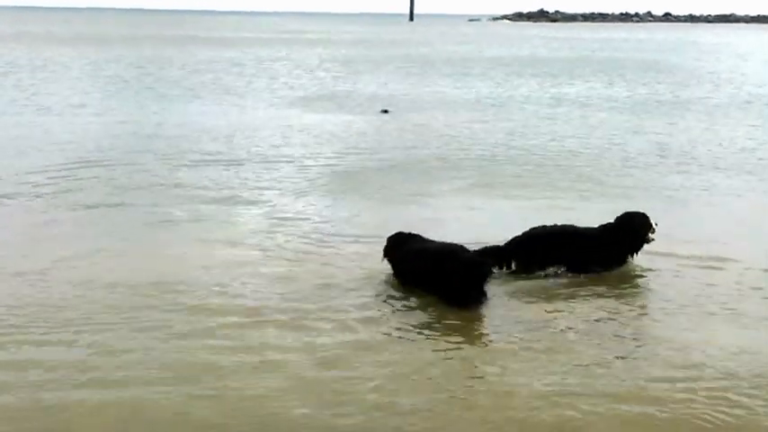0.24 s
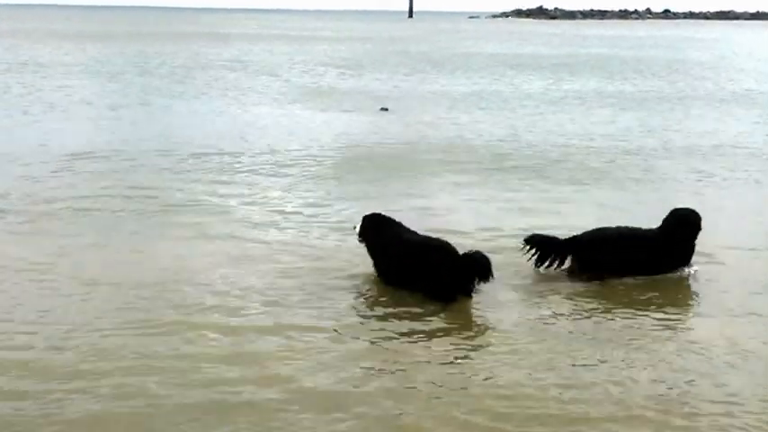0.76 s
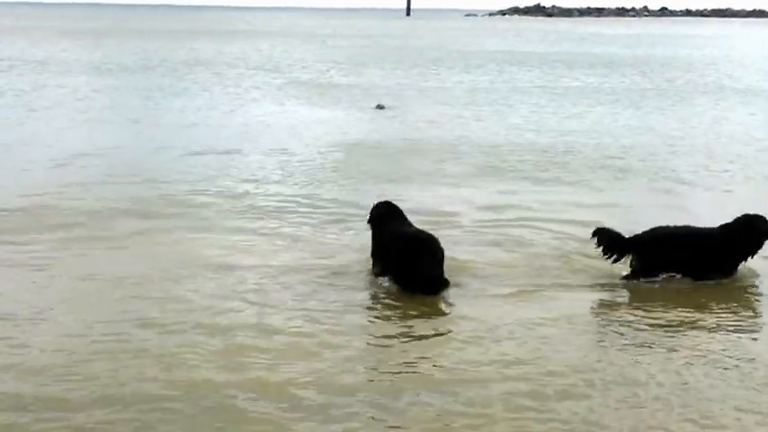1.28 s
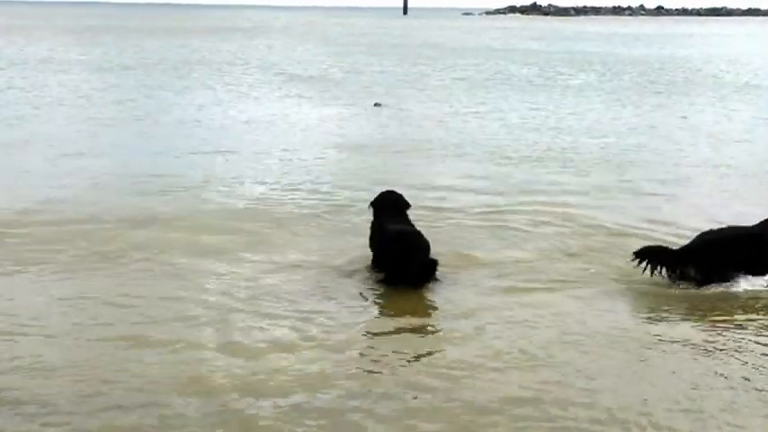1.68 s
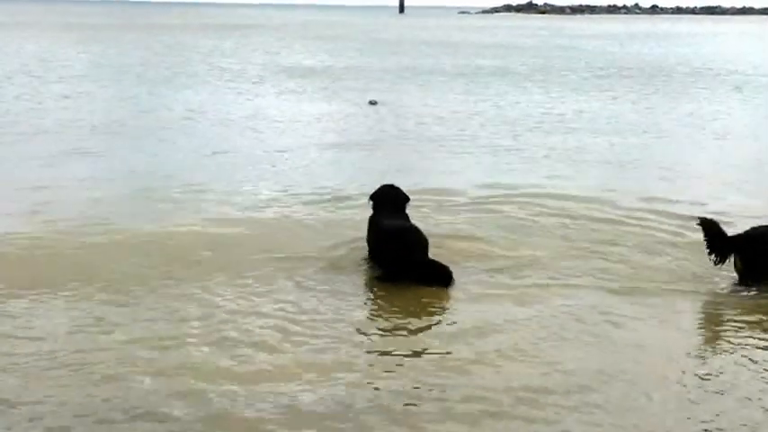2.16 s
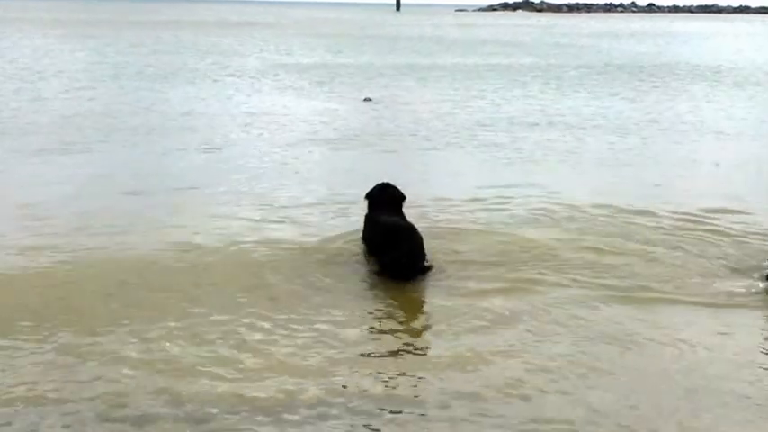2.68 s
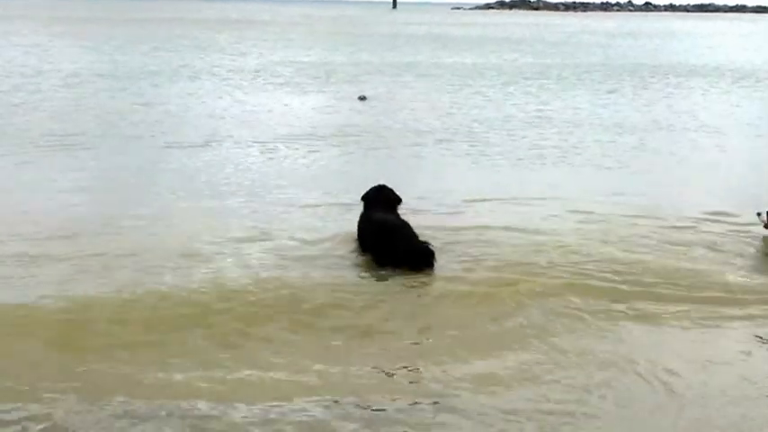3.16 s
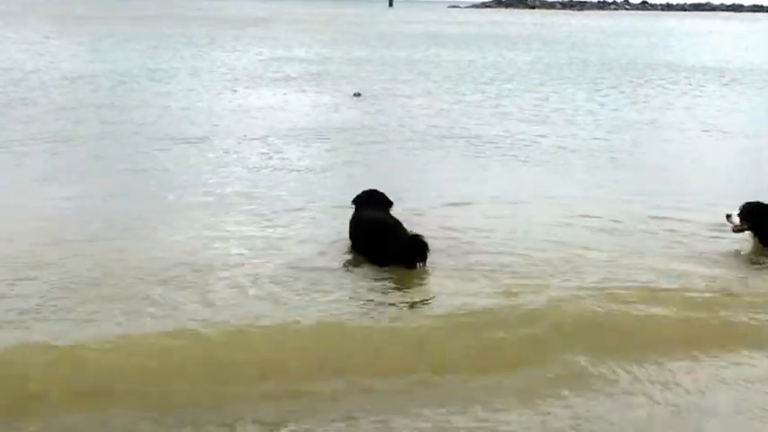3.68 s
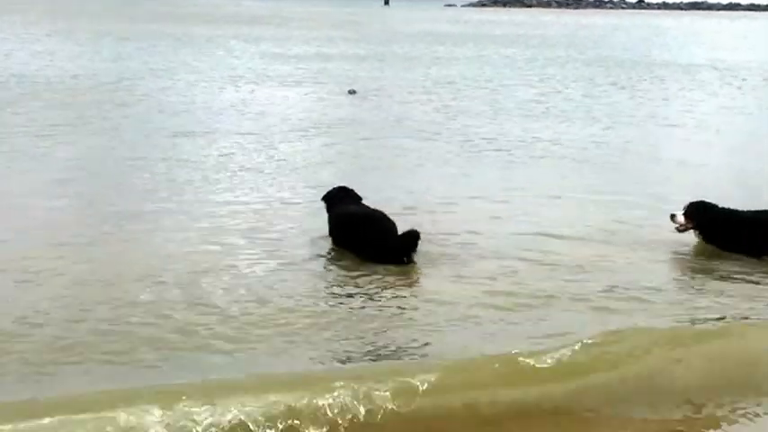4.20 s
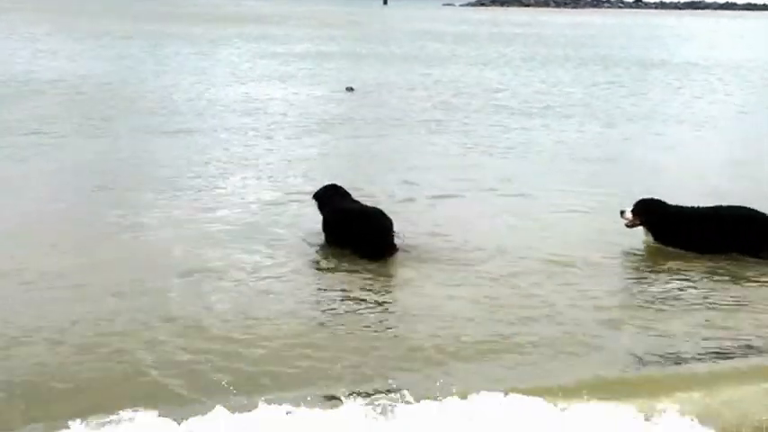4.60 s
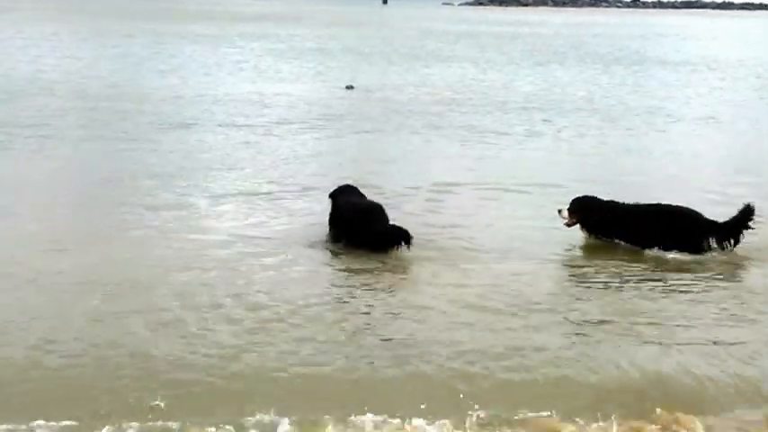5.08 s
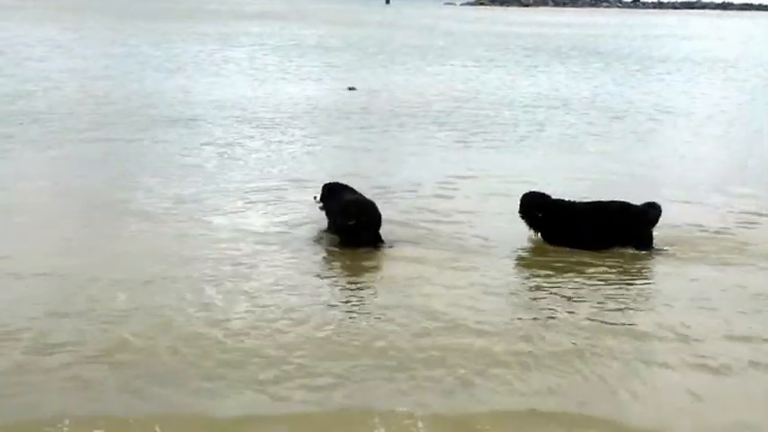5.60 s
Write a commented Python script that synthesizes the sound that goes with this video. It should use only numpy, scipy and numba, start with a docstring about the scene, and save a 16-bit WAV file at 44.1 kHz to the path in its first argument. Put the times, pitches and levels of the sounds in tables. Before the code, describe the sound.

At a sandy shore, a small wave spills with gurgling, slaps and fizzing spray while wind gusts thump the microphone. The water then calms to light drips over a faint murmur of surf further off. Finally a larger wave curls, slaps down and rushes up the sand in bright, bubbly hiss. One microphone stands a few steps away, outdoors, without echo.

```python
"""Small waves reach a sandy beach, heard from a few steps away at one microphone.
At first one spills over amid gusts of wind; then the water lies calm and drips.
Last, a larger wave curls, slaps down and runs up the sand.
Damped bubble rings, from big gurgling ones to fine fizz, make the wash, slaps, thumps of trapped air and drips.
Throughout, filtered noise makes the wind, and noise with foam bubbles makes the surf further along the shore."""
import sys
import numpy as np
from scipy import signal
from scipy.fft import rfft, irfft, next_fast_len
from scipy.io import wavfile
from scipy.ndimage import uniform_filter1d
from numba import njit

SR = 44100
rng = np.random.default_rng(int(sys.argv[2]) if len(sys.argv) > 2 else 0)


def inscribe(sig):
    """Save sig as 16-bit PCM at rate SR to the path in sys.argv[1].

    A 1-D sig is mono; a 2-D sig holds one channel per row.
    Samples are clipped to [-1, 1] before scaling.
    """
    pcm = np.round(np.clip(np.atleast_2d(sig).T, -1, 1) * 32767)
    wavfile.write(sys.argv[1], SR, pcm.astype(np.int16))


N = 257884
TIME = np.arange(N) / SR  # s
RISE = 0.2  # share by which a bubble's pitch climbs while it rings

# pushes of water up the sand or back: (start t/s, build-up t/s, hold t/s, fall/(dB/s),
# fizzing spray level/dB, churning water level/dB, big bubbles level/dB)
SURGES = [(-0.3, 0.28, .3, 22, -40, -40, -45), (0.194, 0.14, 0.97, 44, -36, -37.5, -41),
          (0.5, 0.17, 0.2, 42, -38, -38, -34), (0.81, 0.095, 0.29, 68, -27, -40, -44),
          (0.978, 0.038, 0.044, 70, -39, -27, -33), (1.105, 0.073, 0.044, 92, -24, -31, -33),
          (1.3, 0.059, 0.38, 23.5, -40.5, -39, -43), (1.95, 0.2, 0.17, 7, -50.5, -58, -43.5),
          (2.738, 0.11, 0.086, 42.5, -52, -45.5, -56), (4.124, 0.13, 0.47, 9.5, -19.5, -29, -37),
          (4.48, 0.25, 0.083, 21.5, -16, -20, -24.5), (5.055, 0.1, 0.1, 41, -24, -25.5, -28),
          (5.25, 0.058, 0.28, 26, -28, -55.5, -41), (5.616, 0.053, 0.034, 71, -40, -28, -31.5)]
# relative spectrum of the larger bubbles: (f/Hz, level per Hz/dB)
BUBBLE_SPECTRUM = [(60, -23), (110, -0.5), (220, -1), (330, 0), (420, -3.5), (610, 4.5), (790, 0.5),
                   (1020, 1.5), (1180, -2), (1400, -6), (2200, -10)]
# relative spectrum of spray close by: (f/Hz, level per Hz/dB)
NEAR_SPRAY_SPECTRUM = [(1000, 10), (1380, -2.5), (1650, -0.5), (2080, -9), (2780, 3), (3150, -1),
                       (4000, -2.5), (5100, 2.5), (6200, -1), (7250, 6), (8400, -5), (9350, -4.5),
                       (10400, -12), (11700, -8.5)]
# relative spectrum of fizz further out: (f/Hz, level per Hz/dB)
FAR_FIZZ_SPECTRUM = [(1000, -18), (1400, -1.5), (1900, -1), (2750, 4.5), (3300, 2.5), (4000, -4), (5550, 6),
                     (6350, 1.5), (7400, 8), (8300, -7.5), (9400, -4), (10700, -19)]
NEAR_DB, FAR_DB = -14, -35  # fizz level of a wave at the feet and of one further out
SPLASH_DB = -4.5  # splash against the mean of the spray and churn levels


def wash():
    """Bubble resonance: breaking water entrains air, and the smaller the bubble the higher its pitch."""
    *_, sprayed_db, churned_db, trapped_db = np.transpose(SURGES)
    # heavier water takes longer to build up than the fizz, and dies away at its own pace
    fizz_db = surging(sprayed_db)
    thrown_db = (sprayed_db + churned_db) / 2 + SPLASH_DB
    splash_db = surging(thrown_db, build=1.67, fall=1.58)
    churn_db = surging(churned_db, build=1.38, fall=0.87)
    gurgle_db = surging(trapped_db, build=1.29, fall=0.74)

    gurgle = swarm(156.6, 414, rate=430, cycles=7.6, spread_db=0.7, clump_db=0.0)
    gurgle = unit(colour(gurgle, BUBBLE_SPECTRUM)) * undb(gurgle_db)
    churn = swarm(423, 1252, rate=1700, cycles=18.6, spread_db=1.5, clump_db=1.0)
    churn = unit(colour(churn, BUBBLE_SPECTRUM)) * undb(churn_db)
    splash = swarm(1239, 2280, rate=900, cycles=30.0, spread_db=-2.5, clump_db=-1.3)

    # the countless faintest bubbles merge into a hiss under those heard singly
    hiss = colour(rng.standard_normal(N), [(1800, -21), (2350, -0.5), (11800, -1), (14000, -7)])
    fizz = swarm(2264, 11930, rate=4500, cycles=18.4, spread_db=0.5, clump_db=1.13)
    fizz = unit(fizz + undb(2.5) * unit(hiss))
    spray = splash * undb(splash_db) + fizz * undb(fizz_db)

    # a loud wave is a close one, and its spray keeps more of the top
    near = np.clip((fizz_db - FAR_DB) / (NEAR_DB - FAR_DB), 0, 1)
    near_spray = near * colour(spray, NEAR_SPRAY_SPECTRUM)
    far_spray = (1 - near) * colour(spray, FAR_FIZZ_SPECTRUM)
    return gurgle + churn + near_spray + far_spray + drips(splash_db)


HEAVE_DB, HEAVE_PER_S = 0.49, 14  # spread and rate of the foam's uneven heaving


def surging(levels_db, build=1, fall=1):
    """Power summation: surges build up, hold and decay exponentially; their powers add to one level in dB."""
    power = 1e-12
    for (start, build_s, hold_s, fall_db_s, *_), db in zip(SURGES, levels_db):
        age, rise_s = TIME - start, build_s * build
        swell = np.sin(np.pi / 2 * np.clip(age / rise_s, 0, 1)) ** 2
        spent_db = fall * fall_db_s * np.maximum(age - rise_s - hold_s, 0)
        power = power + (swell * undb(db - spent_db)) ** 2
    return 10 * np.log10(power) + HEAVE_DB * walk(HEAVE_PER_S)


# a crest slaps down: (t/s, mean of body and spray level/dB, length t/s, spray over body level/dB)
SLAPS = [(0.289, -32.5, 0.0042, 13), (0.423, -32.5, 0.017, -4), (0.995, -23, 0.0087, -4),
         (1.16, -21, 0.0078, 10), (1.264, -22, .006, -5), (1.767, -37, 0.011, -13), (1.793, -38, 0.033, 0),
         (1.857, -33.5, 0.0039, -14), (2.923, -43.5, 0.031, -18), (4.137, -40, 0.018, 6),
         (4.157, -37.5, 0.013, 16), (4.215, -20, 0.019, 13), (4.222, -23.5, 0.016, -12.5),
         (4.303, -22.5, 0.0097, 14), (4.476, -22, 0.0067, 9), (4.783, -22, 0.011, 3), (4.907, -23, .02, -9),
         (5.231, -38, 0.0084, -39)]


def slaps():
    """Impact excitation: a falling crest makes a dense, brief burst of bubbles and flings spray."""
    body = swarm(304, 1320, rate=3300, cycles=5.2, spread_db=1.5, clump_db=-1.5)
    body = unit(colour(body, BUBBLE_SPECTRUM))
    spray = swarm(1800, 11300, rate=8000, cycles=8.1, spread_db=1.5, clump_db=-0.5)
    spray = unit(colour(spray, NEAR_SPRAY_SPECTRUM))
    out = np.zeros(N)
    for s, db, length, spray_db in SLAPS:
        span = np.flatnonzero((TIME > s) & (TIME < s + 2 * length))
        age = (TIME[span] - s) / length
        burst = np.minimum(8 * age, 1) * np.exp(-age ** 2)
        mixed = body[span] * undb(-spray_db / 2) + spray[span] * undb(spray_db / 2)
        out[span] += undb(db) * burst * mixed
    return out


# pockets of trapped air and single drops ring: (t/s, level before damping and pinch-off/dB, starting f/Hz)
PLOPS = [(1.002, -12.5, 340), (1.022, -27, 207), (1.043, -19, 750), (1.09, -19.5, 1370), (1.246, -20, 247),
         (1.475, -27, 263), (1.675, -21.5, 256), (1.929, -27.5, 298), (2.02, -23.5, 4930),
         (2.717, -24.5, 6900), (2.752, -28, 1310), (2.846, -35, 1400), (3.063, -29, 5450),
         (3.382, -28, 970), (3.514, -34, 225), (3.878, -34, 2980), (3.965, -26.5, 1670), (4.039, -36, 4530),
         (4.234, -15, 115), (4.378, -12, 3100), (4.6, -14.5, 217), (4.916, -14, 235), (5.275, -12.5, 159),
         (5.289, -13, 314)]
PLOP_T60_S, PLOP_SIZE_LAW = 0.033, 0.67  # ring of a 1 kHz bubble; power by which bigger ones ring longer


def plops():
    """Damped resonance: single bubbles stand out from the wash; the bigger, the longer they ring."""
    s, db, hz = np.transpose(PLOPS).astype(float).copy()
    t60 = PLOP_T60_S * (1000 / hz) ** PLOP_SIZE_LAW
    return bubbles(s, undb(db), hz, t60, RISE)


def drips(splash_db):
    """Sparse bubble resonance: stray drops fall back one by one, louder when more water is thrown."""
    drops = swarm(900, 5040, rate=45, cycles=45, spread_db=3.0, clump_db=1.0)
    return unit(colour(drops, [(900, -11), (5000, 3)])) * undb(0.79 * splash_db - 23.5)


# gusts at the microphone: (t/s, rms level/dB, half length t/s)
GUSTS = [(0.11, -38.5, .05), (0.6, -43, 0.94), (1.04, -38, 0.036), (1.29, -27.5, .08), (1.52, -36, 0.15),
         (1.796, -37, 0.14), (2.345, -47.5, 0.26), (3.606, -52, 0.074), (4.25, -31.5, 0.041),
         (4.376, -38, 0.045), (4.68, -32, 0.087), (4.897, -28, .1), (5.297, -34, .05), (5.69, -46, 0.094)]
# single eddies knock on the microphone: (t/s, peak level/dB)
BUFFETS = [(0.079, -20), (.091, -20.5), (0.127, -21.5), (1.279, -18), (1.326, -30), (1.354, -22),
           (1.489, -17.5), (1.553, -17.5), (1.58, -23), (1.91, -27)]
# relative spectrum of the wind: (f/Hz, level per Hz/dB)
WIND_SPECTRUM = [(15, -26), (30, -4.5), (65, 3.5), (120, 3), (190, -4.5), (400, -33)]
BREEZE_DB, BUFFET_S = -55, 0.0024  # rms level of the air between gusts; width of one knock


def wind():
    """Turbulent pressure: eddies at the microphone give a fluttering rumble and single pressure swings."""
    power = undb(BREEZE_DB) ** 2
    for s, db, half_s in GUSTS:
        power = power + undb(db) ** 2 * np.exp(-((TIME - s) / half_s) ** 2)
    flutter_db = 2 * walk(24.95)
    eddies = colour(rng.standard_normal(N), WIND_SPECTRUM) * undb(flutter_db)
    out = unit(eddies) * np.sqrt(power)
    for s, db in BUFFETS:
        passing = ((TIME - s) / BUFFET_S) ** 2
        out += undb(db) * (1 - passing) * np.exp(-passing / 2)  # a push with a dip before and after
    return out


# relative spectrum of surf further along the shore: (f/Hz, level per Hz/dB)
SURF_SPECTRUM = [(25, 2.5), (80, -10.5), (220, -1), (400, -3), (680, 2), (1020, -6), (1400, -13.5),
                 (2000, -16.5), (2800, -16), (4200, -21.5), (5700, -15), (7400, -17.5), (8400, -24),
                 (11700, -26)]
SURF_DB = -42  # rms level


def far_surf():
    """Incoherent superposition: distant wash blurs into a swelling murmur, with foam ticking on wet sand."""
    foam = swarm(714, 9600, rate=1400, cycles=16, spread_db=4, clump_db=1.7)
    swell_db = .6 * walk(6)
    murmur = rng.standard_normal(N) * undb(swell_db)
    return unit(colour(murmur + undb(-5.5) * foam, SURF_SPECTRUM)) * undb(SURF_DB)


def swarm(lo_hz, hi_hz, rate, cycles, spread_db, clump_db):
    """Random superposition: rate bubbles per s of many sizes, their loudness scattered and clumped in time."""
    clumps_db = clump_db * walk(45)
    when, pitch, rank, sign, damping = rng.random((int(rate * N / SR), 5)).T
    hz = lo_hz * (hi_hz / lo_hz) ** pitch
    # a positive spread makes a few bubbles loud, a negative one a few faint
    db = -spread_db * np.log(rank + 0.038) + clumps_db[(when * N).astype(int)]
    size = np.sign(sign - .5) * undb(db) * hz  # equal power per Hz
    t60 = cycles * 2 ** (2 * damping - 1) / hz  # half to twice the given cycles
    return unit(bubbles(when * N / SR, size, hz, t60, RISE))


@njit
def bubbles(s, size, hz, t60, rise):
    """Damped oscillation: rings take part of a cycle to pinch off and climb in pitch nearing the surface."""
    out = np.zeros(N)
    for k in range(len(s)):
        start, length = int(s[k] * SR), t60[k] * SR
        turn = 2 * np.pi * hz[k] / SR  # radians per sample
        z = size[k] + 0j
        pole = np.exp(1j * turn - np.log(1000) / length)  # 60 dB of decay over the length
        glide = np.exp(1j * turn * rise / length)
        neck, closing = 1., np.exp(-turn / 2)
        for i in range(max(start, 0), min(start + int(length), N)):
            out[i] += z.imag * (1 - neck)
            z, pole, neck = z * pole, pole * glide, neck * closing
    return out


def walk(rate):
    """Random modulation: levels held 1 / rate s, then slewed by a moving average, with rms 1."""
    k = max(int(SR / rate), 2)
    held = np.repeat(rng.standard_normal(N // k + 2), k)[rng.integers(k):]
    return unit(uniform_filter1d(held, k)[:N])


def colour(x, points):
    """Linear filtering: weight the spectrum by (f/Hz, level/dB) points joined along log frequency."""
    hz, db = np.transpose(points)
    size = next_fast_len(N + 4096)
    bins = np.maximum(np.fft.rfftfreq(size, 1 / SR), 1)
    gain = undb(np.interp(np.log(bins), np.log(hz), db))
    return irfft(rfft(x, size) * gain, size)[:N]


def undb(db):
    """Logarithmic level: decibels to amplitude gain."""
    return 10 ** (np.asarray(db) / 20)


def unit(x):
    """Mean-square normalisation: scale to rms 1."""
    return x / np.sqrt(np.mean(x ** 2) + 1e-20)


def scene():
    """Linear superposition: all sources add at one point, alike in both channels."""
    return np.array([wash() + slaps() + plops() + wind() + far_surf()] * 2)


TOP_HZ = 14300  # upper limit of the microphone


def record(dry):
    """Saturation and band limiting: one microphone rounds loud peaks, dulls high treble and cuts the top."""
    rounded = np.tanh(dry[0])
    dull = colour(rounded, [(11700, 0.5), (12100, -18), (14000, -15)])
    lowpass = signal.ellip(8, .2, 70, TOP_HZ, fs=SR, output="sos")
    return np.array([signal.sosfilt(lowpass, dull)] * 2)


dry = scene()
out = record(dry)
inscribe(out)
```